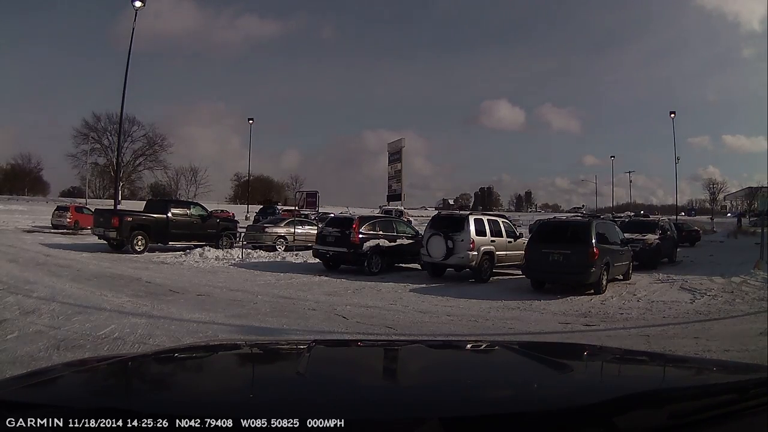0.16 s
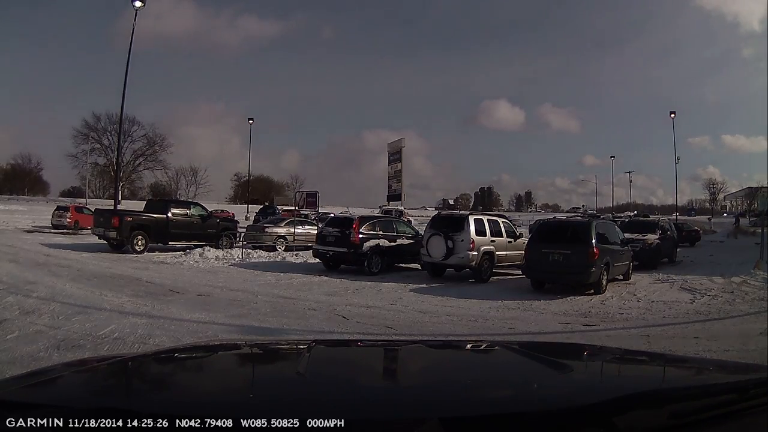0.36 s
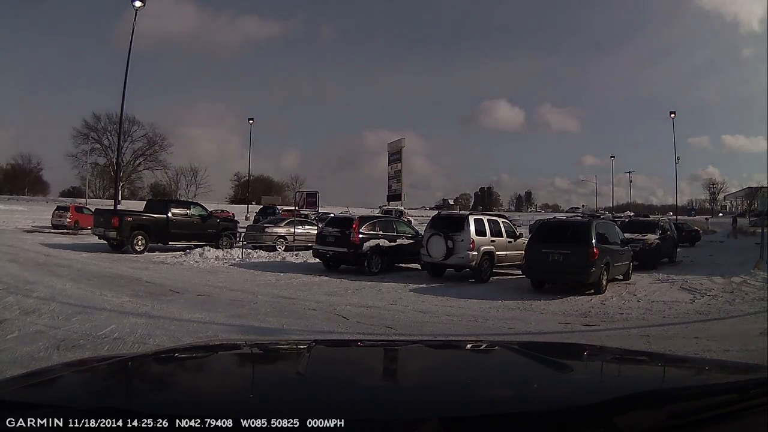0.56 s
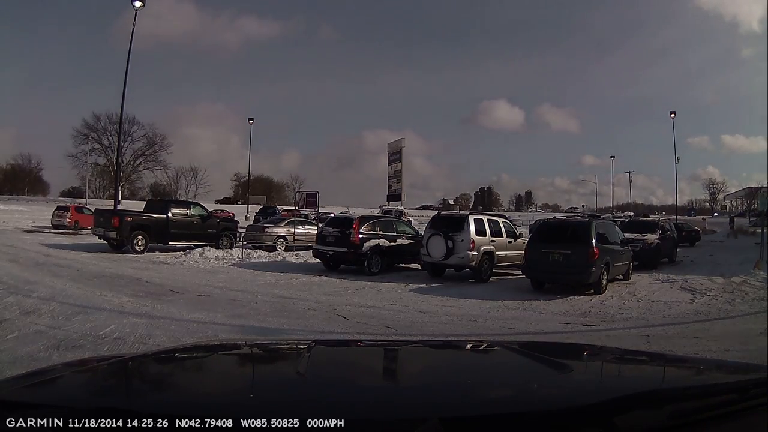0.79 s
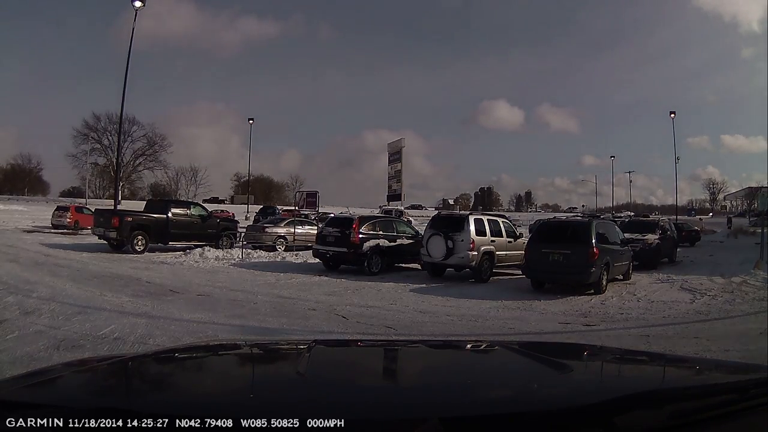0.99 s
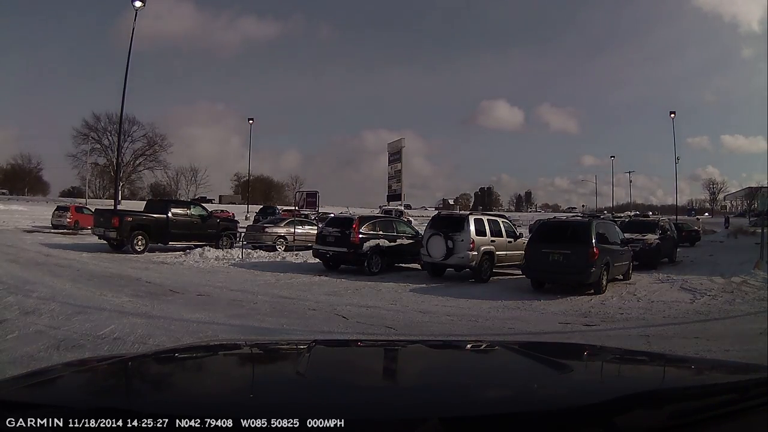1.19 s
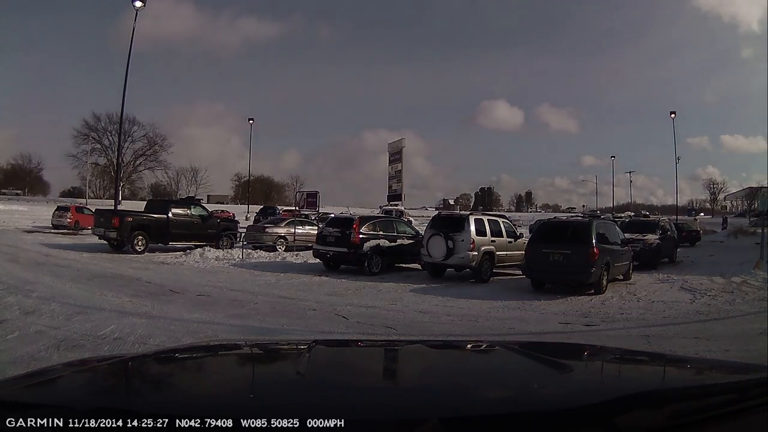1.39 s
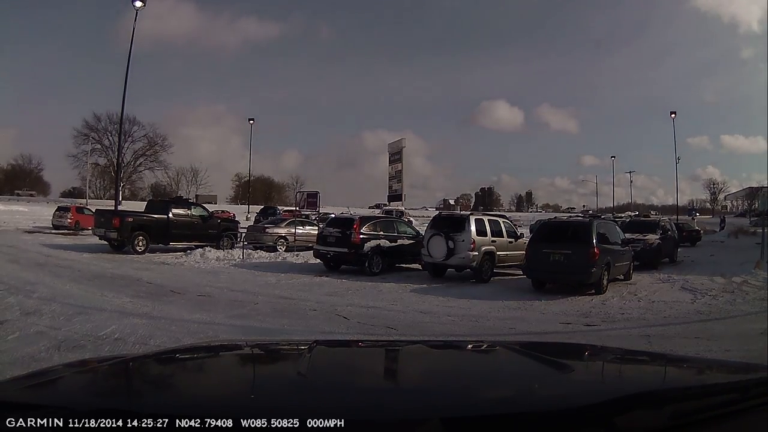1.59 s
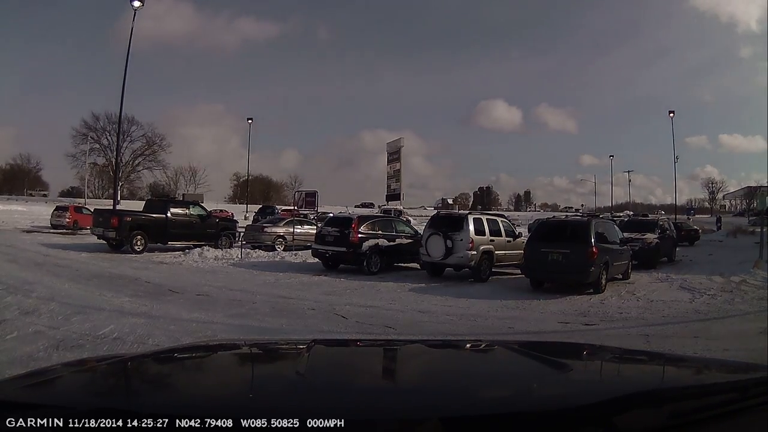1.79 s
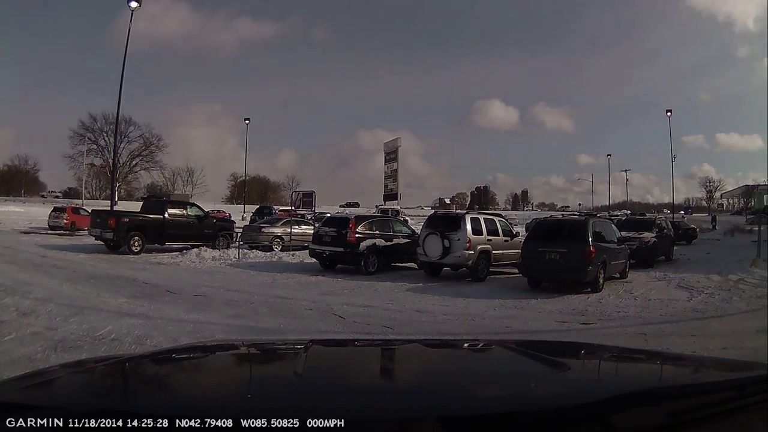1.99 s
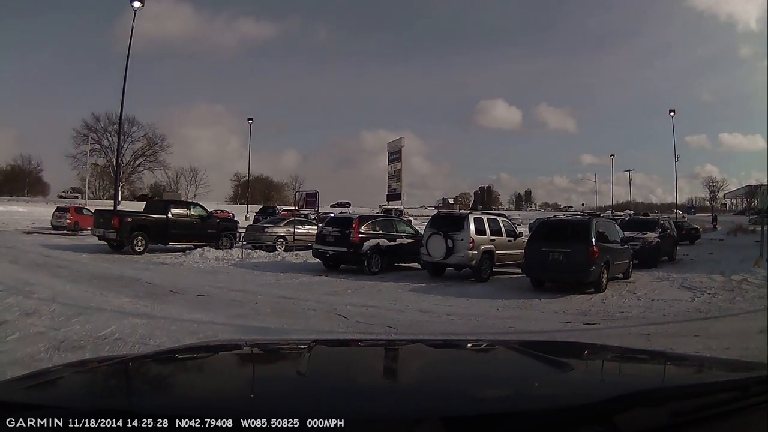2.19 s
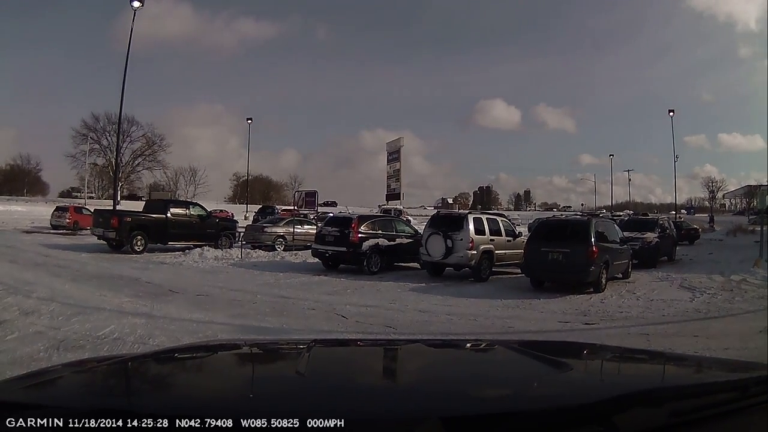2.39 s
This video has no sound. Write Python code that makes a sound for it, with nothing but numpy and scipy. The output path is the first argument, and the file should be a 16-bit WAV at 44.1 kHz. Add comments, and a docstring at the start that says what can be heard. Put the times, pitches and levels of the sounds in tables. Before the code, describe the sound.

Dull knocks on a car console, heard close inside the parked cabin over low engine idle and soft hiss. A clustered thump lands at 0.2 seconds, cloth rustles, strongest around 0.7-0.9, with another firm knock at 0.76 and faint low body rocking after. A thin latch scrape runs 1.3-1.7, crisp clicks at 1.9-2.0, a dull tap at 2.14, then a tiny scrape.

```python
"""Inside a parked car with the engine idling: low rumble and hiss (coloured noise) and one hum (a sine).
Someone shifts about: cloth rustles (grainy noise), dull knocks ring the console (decaying modes), the
body rocks (low swelling sines). Then a small hard latch slides with a thin scrape (random slips ringing
its modes) and clicks three times; a dull tap on the trim and a last brief scrape follow."""
import sys
import numpy as np
from scipy import signal
from scipy.io import wavfile
from scipy.ndimage import uniform_filter1d

SR = 44100
rng = np.random.default_rng(int(sys.argv[2]) if len(sys.argv) > 2 else 0)


def output_pcm(signal):
    """Save a mono or channel-first signal as 16-bit PCM at the path in sys.argv[1].

    Samples are clipped to [-1, 1] before scaling.
    """
    pcm = np.clip(np.atleast_2d(signal).T, -1, 1) * 32767
    wavfile.write(sys.argv[1], SR, np.round(pcm).astype(np.int16))


N = 105840
T = np.arange(N) / SR

# Colour of rumble and hiss. Each row: frequency in Hz, relative density in dB per Hz.
CABIN_COLOUR = [(10, -17.5), (20, -6), (33, -8.5), (42, -5), (56, -9), (73, -1.5), (90, -8), (118, -9.5),
                (142, -16.5), (195, -14), (230, -19), (294, -20), (405, -27.5), (520, -24), (700, -31.5),
                (800, -31), (1090, -38.5), (2000, -42.5), (5000, -45.5), (11000, -45), (16000, -47)]
# Rumble and hum over time. Each row: time in s, bass gain in dB, low-mid gain in dB, hum level in dB.
RUMBLE_LEVELS = [(0, -3.5, -1, -52), (.3, 2.5, 4, -52), (.5, 2, 1.5, -51), (.9, -0.5, 7, -42.5),
                 (1.2, -0.5, 2, -45), (1.6, 2, -2, -45.5), (2.0, 3, -1, -46), (2.2, 5, -3.5, -51),
                 (2.4, -2, 2.5, -50)]
# Cloth rustle over time. Each row: time in s, level in dB, treble gain in dB.
RUSTLE_LEVELS = [(0, -58.5, -1), (.12, -52.5, -8), (.19, -62, -1), (.27, -56, -5), (.38, -66.5, 2.5),
                 (.46, -57, -4), (.5, -58.5, -4), (.55, -55.5, -3), (0.577, -52.5, 8), (.6, -55.5, -4),
                 (.66, -53.5, -16), (.68, -50, -4), (.73, -52.5, 1), (0.752, -47, 1), (.785, -56.5, -2),
                 (.81, -46.5, -9), (.86, -49.5, -1.5), (.9, -54, -1.5), (1.02, -59.5, 4.5), (1.04, -62, -5),
                 (1.08, -71, 0), (1.095, -65.5, 11.5), (1.13, -64, 0), (1.26, -61, -7), (1.31, -66.5, 3),
                 (1.45, -60, -1), (1.56, -62, -6), (1.72, -77, -6)]
# Colour of the main rustle. Each row: frequency in Hz, relative density in dB per Hz.
CLOTH_COLOUR = [(300, -16), (900, -3), (1400, 4), (2100, 6.5), (3000, -2), (4500, -12)]
# Colour of the rustle's treble. Each row: frequency in Hz, relative density in dB per Hz.
CLOTH_TREBLE_COLOUR = [(3000, 5), (5000, 4), (8000, -5.5), (11000, -1), (14000, -21), (16000, -23)]
# Console modes. Each row: frequency in Hz, relative level in dB, t60 in s.
CONSOLE_MODES = [(74.8, -0.5, 0.5), (121, -1, 0.11), (158, -2, 0.13), (202.5, 3.5, .1), (260.4, 0.5, 0.18),
                 (347.6, 8, 0.061), (400, 6, 0.053), (508, -3.5, 0.065), (620, -25.5, 0.073),
                 (860, -13, 0.11), (1077, -17, 0.11), (1300, 5, 0.012), (1950, -14, 0.042)]
# Blows on the console. Each row: start in s, level in dB, centre of the modes woken in Hz,
# spread in octaves, scuff level in dB, scuff fade in s.
CONSOLE_BLOWS = [(0.2108, -27, 380, 0.44, -33, 0.0072), (.2138, -16.5, 333, .5, -31.5, 0.0075),
                 (0.216, -17.5, 1020, 0.35, -42.5, 0.011), (.2205, -13, 386, 0.36, -31.5, 0.011),
                 (.2230, -15.5, 380, .3, -52, .01), (.2325, -14, 117, 0.86, -46.5, 0.028),
                 (0.516, -30, 545, 0.26, -39.5, 0.011), (0.606, -30, 300, 0.26, -72, .008),
                 (.7552, -11, 522, 0.36, -43, 0.011), (.7590, -17, 122, 0.65, -33.5, 0.01),
                 (.7627, -14, 413, 0.17, -58, 0.0079), (1.04, -41, 520, 0.21, -68, .008),
                 (1.109, -29, 420, 0.74, -49, .01)]
# Colour of the scuffs. Each row: frequency in Hz, relative density in dB per Hz.
SCUFF_COLOUR = [(500, 6.5), (1500, 5), (4000, -8.5), (10000, -13), (16000, -22)]
# Body rocks. Each row: start in s, peak of the envelope in dB, frequency in Hz, twice the rise time in s.
BODY_ROCKS = [(0.876, -37, 65.6, 0.048), (0.894, -30.5, 27.3, 0.026), (1.13, -30.5, 30.5, 0.033)]
# Latch modes. Each row: frequency in Hz, relative level in dB, t60 in s at ring length 1.
LATCH_MODES = [(1300, 0, 0.017), (1850, -0.5, .016), (2988, -6, 0.024), (2990, 4.5, 0.023),
               (4070, -11, 0.013), (5020, -19, 0.0086), (5500, -13, 0.014), (6180, -1, 0.0077),
               (7240, -0.5, 0.0055), (7780, -1.5, 0.0046), (8950, -9, 0.0071), (11250, 7.5, 0.002),
               (14000, -18, .003)]
# Latch scraping over time. Each row: time in s, level of the lower modes in dB, of the higher modes in dB.
SCRAPE_LEVELS = [(1.32, -75, -82), (1.335, -62, -78), (1.37, -59.5, -74), (1.398, -60.5, -65),
                 (1.403, -59, -60.5), (1.44, -62.5, -60.5), (1.535, -58.5, -61.5), (1.545, -59, -65),
                 (1.57, -65, -70), (1.6, -63, -74), (1.66, -67.5, -68), (1.7, -72, -74), (1.73, -85, -78),
                 (1.76, -88, -76), (2.18, -90, -90), (2.21, -66, -85), (2.26, -74, -93)]
# Latch clicks. Each row: start in s, level of the light first touch in dB, centre of the modes woken in Hz,
# spread in octaves, ring length as a factor on t60.
LATCH_CLICKS = [(1.9127, -20.5, 4980, 0.6, 1), (1.9359, -29.5, 5230, 1.33, 0.7),
                (1.9976, -35, 6760, 1.1, .8)]
# Trim modes. Each row: frequency in Hz, relative level in dB, t60 in s.
TRIM_MODES = [(950, -6, .014), (1290, -9.5, 0.013), (1770, -1, .012), (2550, -9, 0.0088),
              (3010, -9.5, 0.012), (3900, -20, .006), (6300, -13, .006)]

CABIN_DB, BASS_TOP_HZ, RUMBLE_TOP_HZ = -40.5, 125, 540
HUM_HZ, HUM_DRIFT_HZ, HUM_WAVER_DB = 42.1, .5, 1.3  # drift and waver are rms
GRAIN_DB, GRAIN_SAMPLES = 1.5, 150
KNOCK_PAD_S, TAP_PAD_S = .0009, .0004  # onset ramps
SLIPS_PER_S, SLIP_DB, SLIP_CAP = 3000, 3.0, 4  # slip gain: SLIP_DB times a capped exponential draw
BOUNCE_S, BOUNCE_DB = .0004, 8  # delay and gain of the full click after its first touch
TAP_S, TAP_DB = 2.1367, -25.5
EDGE_HZ = 15900


def amp(db):
    """Amplitude factor of a level in dB."""
    return 10 ** (np.asarray(db) / 20)


def evened(x):
    """Scale to rms 1."""
    return x / np.sqrt(np.mean(x ** 2) + 1e-20)


def add(mix, start_s, sound):
    """Mix a sound in place, cut at the end of the mix."""
    part = mix[round(start_s * SR):][:len(sound)]
    part += sound[:len(part)]


def slow_wander(t, top_hz):
    """Random wander of rms 1: 24 slow sines, weaker with frequency."""
    sines = (np.sin(2 * np.pi * (hz * t + rng.random())) / np.sqrt(hz) for hz in np.geomspace(.3, top_hz, 24))
    return evened(sum(sines))


def noise(spectrum, size, patchy_db, field=lambda hz, t: 0):
    """Random short-time spectra with a colour, drifting patches and a dB field over time and pitch."""
    hop = size // 4
    frames, hz = N // hop + 5, np.fft.rfftfreq(size, 1 / SR)
    real, imag, patches = rng.standard_normal((frames, len(hz), 3)).T
    patches = uniform_filter1d(patches, size=6, axis=0)
    patches = evened(uniform_filter1d(patches, size=6, axis=1))
    table_hz, table_db = np.transpose(spectrum)
    colour_db = np.interp(np.log(hz + 1), np.log(table_hz + 1), table_db)[:, None]
    colour = evened(amp(colour_db + patchy_db * patches))
    colour = colour * amp(field(hz[:, None], np.arange(frames) * hop / SR))
    sound = signal.istft((real + 1j * imag) * colour, nperseg=size, noverlap=size - hop)[1][:N]
    return sound / np.sqrt(size * 2 / 3)


def ring(modes, centre_hz, spread_octaves, length=1, mode_factor=-1.):
    """One blow, peak 1: decaying modes, strongest near the centre; factor -1 flips every other mode."""
    hz, db, t60_s = np.transpose(modes)[:, :, None]
    t60_s = length * t60_s
    t = np.arange(0, t60_s.max(), 1 / SR)
    octaves_off = np.log2(hz / centre_hz)
    weight = np.exp(-.5 * (octaves_off / max(spread_octaves, .05)) ** 2)
    weight = weight * mode_factor ** np.arange(len(modes))[:, None]
    sound = (weight * amp(db - 60 * t / t60_s) * np.sin(2 * np.pi * hz * t)).sum(0)
    return sound / abs(sound).max()


def padded(blow, pad_s):
    """Soften a blow's onset with a linear ramp."""
    return blow * np.minimum(np.arange(len(blow)) / (pad_s * SR), 1)


def rumble_and_hiss():
    """Coloured noise: bass and low mids swell and dip, the hiss above holds steady."""
    t, bass_db, mid_db, _ = np.transpose(RUMBLE_LEVELS)

    def below(hz, top_hz):
        return 1 / (1 + (hz / top_hz) ** 2) ** 2

    def swell_db(hz, at):
        bass_extra_db = np.interp(at, t, bass_db - mid_db) * below(hz, BASS_TOP_HZ)
        return bass_extra_db + np.interp(at, t, mid_db) * below(hz, RUMBLE_TOP_HZ)

    return amp(CABIN_DB) * noise(CABIN_COLOUR, size=4096, patchy_db=2.24, field=swell_db)


def idling_hum():
    """One sine of the idling engine, wandering in pitch and level."""
    t, _, _, hum_db = np.transpose(RUMBLE_LEVELS)
    level = amp(np.interp(T, t, hum_db) + HUM_WAVER_DB * slow_wander(T, 5))
    hz = HUM_HZ + HUM_DRIFT_HZ * slow_wander(T, 3.9)
    return np.sqrt(2) * level * np.sin(2 * np.pi * np.cumsum(hz) / SR)


def rustle():
    """Cloth drags on the seat: grainy noise whose treble comes and goes."""
    t, db, treble_db = np.transpose(RUSTLE_LEVELS)
    grain = amp(GRAIN_DB * evened(uniform_filter1d(rng.standard_normal(N), size=GRAIN_SAMPLES)))
    main = noise(CLOTH_COLOUR, size=512, patchy_db=3.45)
    treble = noise(CLOTH_TREBLE_COLOUR, size=512, patchy_db=0.5)
    cloth = main + amp(np.interp(T, t, treble_db)) * treble
    return cloth * grain * amp(np.interp(T, t, db, right=-120))


def knocks():
    """Padded blows ring the console modes, each with a short noise scuff."""
    out = np.zeros(N)
    scuff = noise(SCUFF_COLOUR, size=512, patchy_db=2.5)
    for start_s, db, centre_hz, spread_octaves, scuff_db, scuff_s in CONSOLE_BLOWS:
        blow = ring(CONSOLE_MODES, centre_hz, spread_octaves, mode_factor=0.95)
        add(out, start_s, amp(db) * padded(blow, KNOCK_PAD_S))
        u = np.maximum(T - start_s, 0) / scuff_s
        out += amp(scuff_db) * scuff * np.minimum(4 * u, 1) * np.exp(-u ** 2)
    return out


def body_rocks():
    """The body rocks on its springs: low sines that swell briefly and die away."""
    out = np.zeros(N)
    for start_s, db, hz, fade_s in BODY_ROCKS:
        t = np.maximum(T - start_s, 0)
        u = 2 * t / fade_s
        out += amp(db) * np.e * u * np.exp(-u) * np.sin(2 * np.pi * hz * t)
    return out


def scrape_band(level_db, woken):
    """Dense tiny slips of random size and sign ring some of the latch modes."""
    size = amp(SLIP_DB * np.minimum(rng.exponential(1, N), SLIP_CAP))
    sign = np.sign(rng.standard_normal(N))
    slips = size * sign * (rng.random(N) < SLIPS_PER_S / SR)
    sound = evened(signal.oaconvolve(slips, woken)[:N])
    t = np.transpose(SCRAPE_LEVELS)[0]
    return sound * amp(np.interp(T, t, level_db, left=-120, right=-120))


def latch_scrape():
    """The latch sings as it slides, in a lower and a higher group of modes."""
    _, low_db, high_db = np.transpose(SCRAPE_LEVELS)
    low = ring(LATCH_MODES, centre_hz=3850, spread_octaves=0.71, length=0.74)
    high = ring(LATCH_MODES, centre_hz=7420, spread_octaves=0.084, length=1.3)
    return scrape_band(low_db, low) + scrape_band(high_db, high)


def latch_clicks():
    """Each click rings the latch modes twice: a light first touch, then the full click."""
    out = np.zeros(N)
    for start_s, db, centre_hz, spread_octaves, length in LATCH_CLICKS:
        touch = amp(db) * ring(LATCH_MODES, centre_hz, spread_octaves, length)
        add(out, start_s, touch)
        add(out, start_s + BOUNCE_S, amp(BOUNCE_DB) * touch)
    return out


def trim_tap():
    """One dull tap rings the trim modes."""
    out = np.zeros(N)
    tap = ring(TRIM_MODES, centre_hz=1900, spread_octaves=1.8)
    add(out, TAP_S, amp(TAP_DB) * padded(tap, TAP_PAD_S))
    return out


def scene():
    """Sum of all sources, one channel."""
    cabin = rumble_and_hiss() + idling_hum()
    movement = rustle() + knocks() + body_rocks()
    latch = latch_scrape() + latch_clicks() + trim_tap()
    return (cabin + movement + latch)[None]


def record(dry):
    """Band limit: linear-phase low-pass at EDGE_HZ."""
    lowpass = signal.firwin(511, EDGE_HZ, window=("kaiser", 9), fs=SR)
    return signal.oaconvolve(dry, lowpass[None], "same")


dry = scene()
out = record(dry)
output_pcm(out)
```